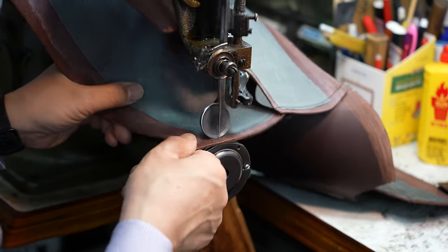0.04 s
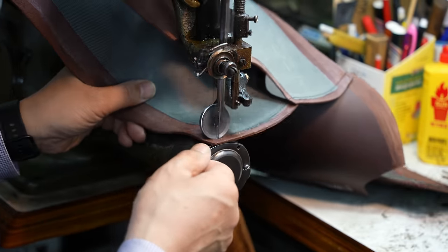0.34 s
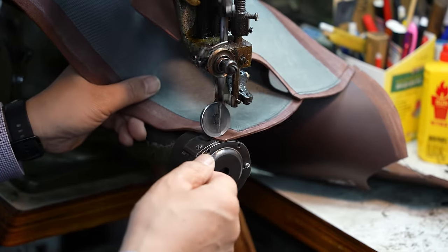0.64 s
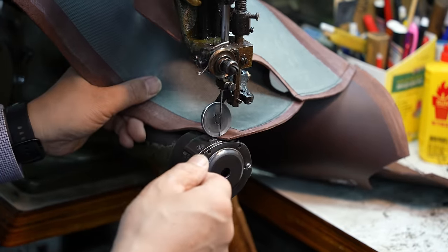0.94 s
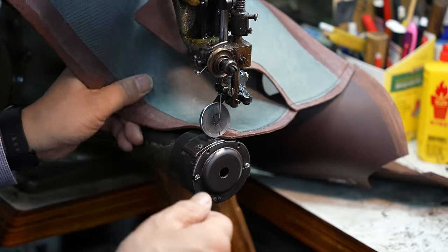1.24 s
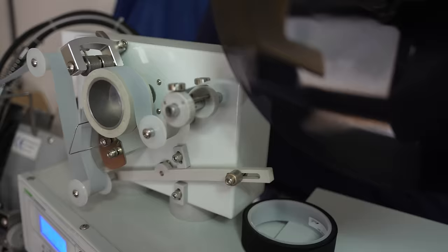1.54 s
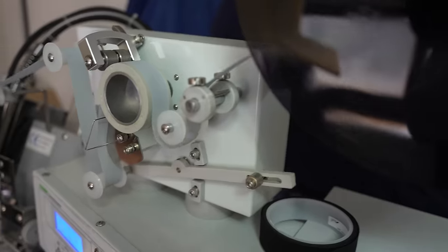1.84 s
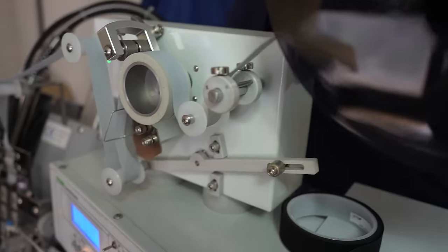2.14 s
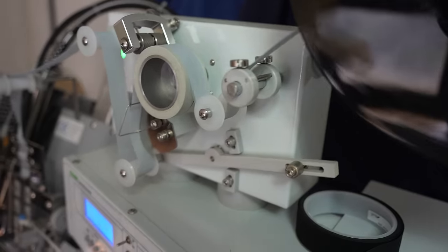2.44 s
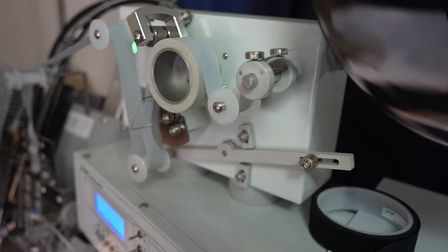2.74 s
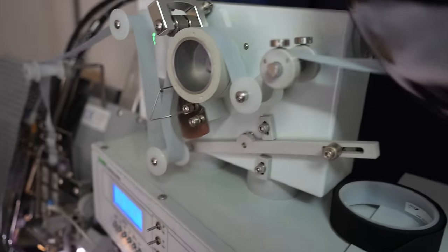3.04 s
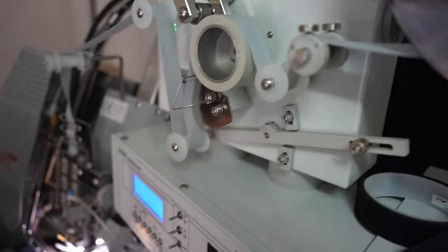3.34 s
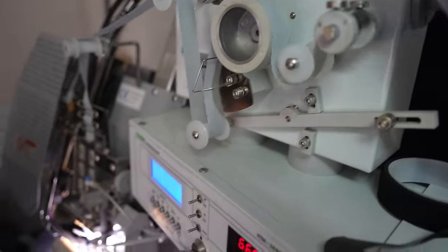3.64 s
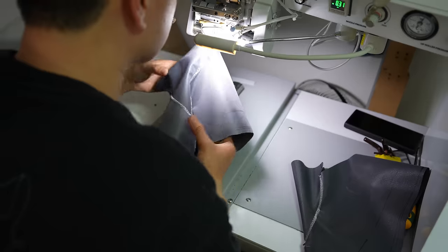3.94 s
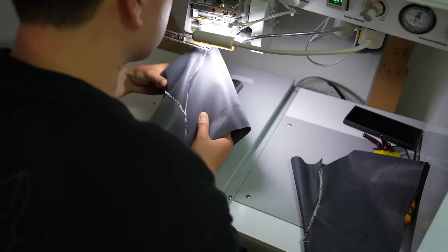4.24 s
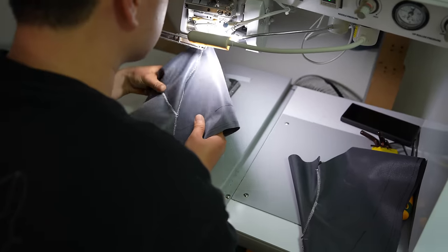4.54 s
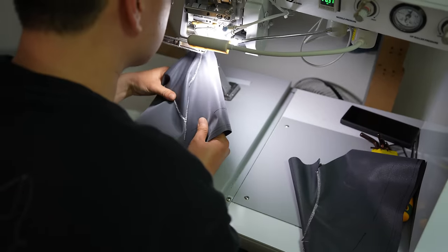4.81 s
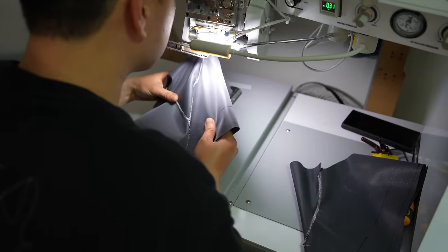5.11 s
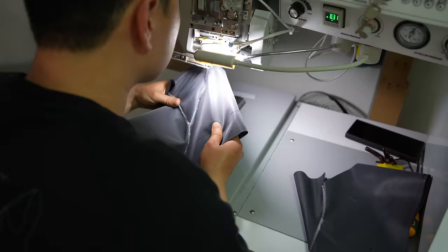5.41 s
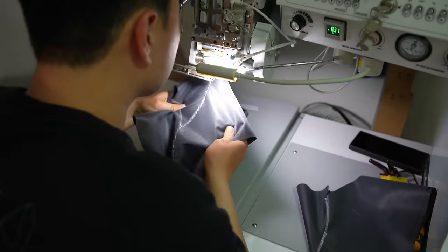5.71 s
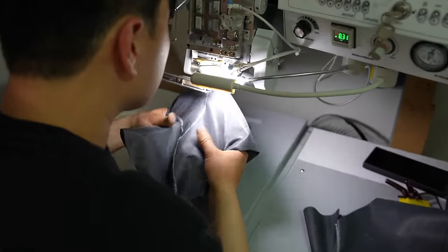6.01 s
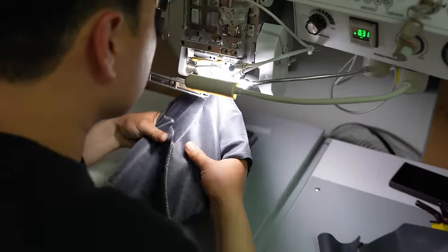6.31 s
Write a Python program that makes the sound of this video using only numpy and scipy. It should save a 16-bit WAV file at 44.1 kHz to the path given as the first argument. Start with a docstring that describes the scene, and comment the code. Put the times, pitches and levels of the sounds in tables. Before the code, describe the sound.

A brief, fast clatter from a heavy sewing machine gives way to slow, uneven clacks as its rods move one by one. Then air suddenly rushes from the nozzle of a seam taping machine and keeps hissing over a low hum. Heard first from beside the tape feed and then from the operator's seat in the workshop, the hiss shifts in tone, with one clunk and later a few mechanical knocks.

```python
"""A hot-air machine that tapes seams hisses in a workshop, after a heavy sewing machine has had its turn.
The sewing machine clatters through leather as its parts strike, brakes, and inches on with single clacks.
Then air rushes through the taping nozzle over a droning blower, heard first beside the tape feed and then
from the operator's seat, where it starts low, opens up with a clunk, and the mechanism knocks again."""
import sys
import numpy as np
from scipy import signal
from scipy.fft import irfft, next_fast_len
from scipy.io import wavfile
from scipy.ndimage import map_coordinates

SR = 44100
rng = np.random.default_rng(int(sys.argv[2]) if len(sys.argv) > 2 else 0)


def inscribe(sig):
    """Save sig as 16-bit PCM at rate SR to the path in sys.argv[1].

    A 1-D sig is mono; a 2-D sig holds one channel per row.
    Samples are clipped to [-1, 1] before scaling.
    """
    pcm = np.round(np.clip(np.atleast_2d(sig).T, -1, 1) * 32767)
    wavfile.write(sys.argv[1], SR, pcm.astype(np.int16))


N = 280917
TIME = np.arange(N) / SR
BRAKE_S, TAPING_S, SEAT_S, AIR_OPEN_S = .47, 1.578, 3.811, 3.988

# how hard the sewing machine's parts strike: (time [s], relative level [dB])
STRIKE_FORCE = [(0.0, -11.5), (0.454, -13), (0.538, -24.5), (0.56, -37)]
# how alike the ears are, at the sewing machine and the taping seat: (frequency [Hz], likeness [-1 to 1])
SEWING_LIKENESS = [(60, 0.99), (130, 1), (290, 0.96), (640, 0.73), (1410, 0.57), (3100, 0.31),
                   (6820, 0.064), (15000, 0.091)]
SEAT_LIKENESS = [(60, 1), (130, 1), (290, 0.95), (640, 0.95), (1410, 0.63), (3100, 0.67), (6820, 0.057),
                 (15000, 0.16)]
# which ear is louder in those places: (frequency [Hz], left minus right [dB])
SEWING_BALANCE = [(60, 0.0), (180, 0.44), (550, -0.64), (1650, -1.5), (4970, -0.81), (15000, -1.7)]
SEAT_BALANCE = [(60, 0.0), (130, 0.0), (290, 0.5), (640, 1.0), (1410, 0.25), (3100, 1), (6820, -1.9),
                (15000, -1.7)]
SEWING_STEREO, SEAT_STEREO = (SEWING_LIKENESS, SEWING_BALANCE), (SEAT_LIKENESS, SEAT_BALANCE)


def from_db(db):
    """Turn decibels into a gain to multiply by."""
    return 10 ** (np.asarray(db) / 20)


def rms_one(x):
    """Scale a stereo sound so that the average of its two sides has strength (rms) 1."""
    return x / np.sqrt(np.mean(x.mean(0) ** 2) + 1e-20)


def in_time(rows):
    """Read a (time, value) table at every sample."""
    return np.interp(TIME, *np.transpose(rows))


def at_hz(points, hz):
    """Read a (frequency, value) table, with octaves evenly spaced."""
    f, value = np.transpose(points)
    return np.interp(np.log(hz), np.log(f), value)


def after(s):
    """Switch from 0 to 1 within two milliseconds."""
    return np.clip((TIME - s) * 500, 0, 1)


def bump(centre_s, width_s):
    """A smooth rise to 1 and back."""
    return np.exp(-((TIME - centre_s) / width_s) ** 2)


def wander(rate_hz):
    """A smooth random curve, mostly between -1 and 1."""
    points = rng.standard_normal(int(N / SR * rate_hz) + 3)
    return map_coordinates(points, [TIME * rate_hz], order=3, mode="nearest")


def by_place(feed_db, seat_db):
    """One level beside the tape feed, another at the seat."""
    return feed_db + (seat_db - feed_db) * after(SEAT_S)


def filtered(x, hz, kind):
    """A gentle (second-order) filter."""
    return signal.sosfilt(signal.butter(2, hz, kind, fs=SR, output="sos"), x)


def freqs(size):
    """The frequencies that make up a sound of this many samples."""
    return np.maximum(np.arange(size // 2 + 1) * SR / size, 1)


def peak(centre_hz, width_hz, size):
    """Gain at each frequency for one resonance, a pitch at which something likes to ring."""
    return 1 / (1 + (2 * (freqs(size) - centre_hz) / width_hz) ** 2)


def resonant(colour, modes, modes_db, size):
    """Gain at each frequency: a broad tone colour with resonances (modes) standing out of it."""
    peaks = sum(from_db(db) * peak(hz, width, size) for hz, width, db in modes)
    return from_db(at_hz(colour, freqs(size))) * (1 + from_db(modes_db) * peaks)


def noise(gain, size, stereo):
    """Stereo noise with a gain at each frequency, alike in both ears in the bass, wide in the treble."""
    likeness, balance = stereo
    hz, sides = freqs(size), np.array([[1], [-1]])
    mid, side = np.exp(2j * np.pi * rng.random((2, len(hz))))
    alike = np.clip(at_hz(likeness, hz), -.99, .999)
    pair = mid + np.sqrt((1 - alike) / (1 + alike)) * side * sides
    return rms_one(irfft(gain * pair * from_db(sides * at_hz(balance, hz) / 2), size))


def steady(gain_of_size, stereo):
    """Noise that lasts the whole scene."""
    size = next_fast_len(N, real=True)
    return noise(gain_of_size(size), size, stereo)[:, :N]


def coloured_noise(colour):
    """Steady noise with a broad tone colour."""
    return steady(lambda size: from_db(at_hz(colour, freqs(size))), SEWING_STEREO)


def dying(size, ring_t60, room_db, room_t60, attack_s=0.00027):
    """A struck part rings briefly, the room a little longer; t60 is the seconds taken to fade 60 dB."""
    t = np.arange(size) / SR
    ring, room = from_db(-60 * t / ring_t60), from_db(room_db - 60 * t / room_t60)
    return np.hypot(ring, room) * (1 - np.exp(-t / attack_s))


def add(out, s, sound):
    """Mix a sound in, starting at s seconds."""
    i = max(round(s * SR), 0)
    out[:, i:i + sound.shape[1]] += sound[:, :N - i]


def quiet_shop(level_db=-38.5):
    """The faint, steady noise of the workshop."""
    # tone colour of the room: (frequency [Hz], relative level [dB])
    colour = [(15, -61), (25, -31), (49, -13), (86, -12), (121, -2), (150, -21), (213, -9), (271, -26),
              (373, -20), (415, -16.5), (588, -26), (833, -24.5), (2240, -29.5), (5570, -25), (15000, -41)]
    return from_db(level_db) * coloured_noise(colour)


def table_shake(run_db=-39, attack_s=.015, t60_s=0.38):
    """The sewing table rumbles while the drive pushes, in the run and in each nudge, then rings out."""
    # tone colour of the table: (frequency [Hz], relative level [dB])
    colour = [(21, -33), (35, -32), (70, -3), (109, -12), (134, -16), (200, -9.5), (250, -22), (320, -40),
              (550, -120)]
    # the drive nudges the machine on: (start [s], length [s], level [dB])
    nudges = [(.67, .04, -42), (.76, .155, -36), (1.072, 0.079, -39), (1.19, .07, -36)]
    power = 0
    for start, length, db in [(0.0076, BRAKE_S, run_db)] + nudges:
        attack = np.clip((TIME - start) / attack_s, 0, 1)
        fade_db = 60 * np.maximum(TIME - start - length, 0) / t60_s
        power += (attack * from_db(db - fade_db)) ** 2
    return np.sqrt(power) * coloured_noise(colour)


def sewing_speed(loss_per_s=6.0):
    """Share of full speed: steady, then falling to half under the brake."""
    return np.clip(1 - loss_per_s * (TIME - BRAKE_S), .5, 1)


def clatter(stitches_per_s=24.9, jitter_s=.0004, uneven_db=0.9, rattle_hz=900, level_db=-6.5, size=16384):
    """The same parts strike in every turn of the sewing machine; loose parts rattle anew each time."""
    # strikes of needle bar, hook, feed and foot: (point in the turn [0 to 1], relative level [dB])
    strikes = [(.01, 2), (.17, 2), (.32, 1), (.5, -.5), (.65, -2), (.85, -1.5)]
    # tone colour of the machine's body: (frequency [Hz], relative level [dB])
    colour = [(32, -43), (55, -18), (92, -4), (125, -17), (215, 10), (259, 3.5), (343, 2), (548, -15),
              (631, -3.5), (693, -4.5), (919, -4.5), (1610, -1.5), (3580, -7), (4750, -6.5), (15000, -16)]
    # its resonances: (frequency [Hz], width [Hz], relative level [dB])
    modes = [(367, 46, -5), (650, 18, -2), (940, 150, -7), (1610, 230, -4), (2360, 31, -17), (2660, 37, -4),
             (2970, 79, 0), (3950, 40, -15), (4640, 660, 0), (5850, 130, 0)]
    # loose parts rattle harder as the needle meets thicker leather: (time [s], relative level [dB])
    rattle_levels = [(0, -3), (.26, -1), (.325, 1.5), (.365, -2.5), (.41, -2), (.45, -1.5), (.5, -4)]
    out, hz = np.zeros((2, N)), freqs(size)
    force_db, rattle_db = in_time(STRIKE_FORCE), in_time(rattle_levels)
    turns = stitches_per_s * np.cumsum(sewing_speed()) / SR
    body = resonant(colour, modes, -3.0, size)
    envelope = dying(size, ring_t60=0.063, room_db=-4.0, room_t60=0.24)
    rattle_pitches = np.linspace(np.log(rattle_hz), np.log(SR / 2), 48)
    for share, db in strikes:
        ring = noise(body, size, SEWING_STEREO)
        for turn in range(13):
            i = np.searchsorted(turns, turn + share)
            # each rattle favours a few pitches of its own, and a harder one is brighter
            favoured_db = 4 * np.interp(np.log(hz), rattle_pitches, rng.standard_normal(48))
            tilt_db = 0.29 * (rattle_db[i] - rattle_db[0]) * np.log2(hz / rattle_hz)
            rattle = noise(body * from_db(favoured_db + tilt_db) * (hz > rattle_hz), size, SEWING_STEREO)
            gain = from_db(force_db[i] + db + level_db + rng.normal(0, uneven_db))
            strike = gain * envelope * (ring + from_db(rattle_db[i]) * rattle)
            add(out, i / SR + rng.normal(0, jitter_s), strike)
    return filtered(out, 450, "high")


def frame_hum(level_db=-1.0, waver_db=2.5):
    """The sewing machine's frame shakes in tones that sink with the speed and waver in strength."""
    # tones of the frame: (frequency at full speed [Hz], relative level [dB])
    tones = [(102.3, -37.5), (150.7, -43), (199.2, -40), (226.1, -36), (349.9, -33), (403.7, -44.5),
             (425.3, -39), (452.2, -46), (479.1, -55), (527.6, -51), (629.8, -40), (656.8, -37),
             (753.7, -41), (855.9, -36), (931.3, -35), (1007, -36), (1055, -40)]
    out, end = np.zeros((2, N)), round(STRIKE_FORCE[-1][0] * SR)
    travel = np.cumsum(sewing_speed()[:end]) / SR
    force_db = in_time(STRIKE_FORCE)[:end]
    for hz, db in tones:
        waver = np.interp(np.arange(end), np.linspace(0, end, 12), rng.standard_normal(12))
        tone = np.sqrt(2) * np.sin(2 * np.pi * (hz * travel + rng.random()))
        out[:, :end] += from_db(db + level_db + force_db - force_db[0] + waver_db * waver) * tone
    return out


def linkage_clacks(level_db=-4, size=16384):
    """Turned slowly, the sewing machine's linked rods strike one by one: a knock, a clack and a crack."""
    # single clacks: (time [s], relative level [dB], extra for the knock [dB], extra for the crack [dB])
    clacks = [(0.601, -24, -16, 1), (0.6723, -18, -17, -7), (0.737, -15.5, -31, -5.5),
              (0.7606, -20.5, -18, -1), (0.7843, -18, -23, 0.5), (0.7933, -14.5, -25, -3.5),
              (0.82, -22, -20, -14), (0.8457, -18, -15, -1), (0.8559, -21.5, -7, 6), (0.8706, -29, -8, 5),
              (0.9868, -25, -19, -2), (1.069, -18, -17, -10), (1.108, -26.5, -19, 0), (1.147, -26, -17, -6),
              (1.1804, -25.5, -6, -9), (1.1902, -20, -10, 3.5), (1.2063, -28, -10, 5),
              (1.2521, -27, -19, -2), (1.289, -27.5, -17, 2.5)]
    # tone colour of a clack: (frequency [Hz], relative level [dB])
    colour = [(88, -37), (150, -14), (409, -3), (505, -22), (612, -2.5), (1350, -5), (2060, -3.5),
              (2970, -9), (3270, -10.5), (7640, -23.5), (15000, -26)]
    # resonances of the rods: (frequency [Hz], width [Hz], relative level [dB])
    modes = [(339, 72, -4.5), (897, 31, -3), (1340, 250, -4), (1610, 62, -6), (3040, 200, -10),
             (3290, 69, -4), (3790, 39, -8), (4210, 74, -9), (5020, 53, -5), (5330, 31, -2), (5970, 35, 3),
             (6600, 50, 2)]
    out, body = np.zeros((2, N)), resonant(colour, modes, 4.7, size)
    for s, db, knock_db, crack_db in clacks:
        parts = [(knock_db + 9, -5, [250, 950]),   # low knock
                 (0, -10, [1000, 4200]),           # ringing clack
                 (crack_db, -4, [4600, 16000])]    # bright crack
        for part_db, room_db, band_hz in parts:
            ring = rms_one(filtered(noise(body, size, SEWING_STEREO), band_hz, "band"))
            envelope = dying(size, ring_t60=0.076, room_db=room_db, room_t60=0.32, attack_s=0.0029)
            add(out, s - .001, from_db(db + level_db + part_db) * ring * envelope)
    return out


def rumble(swell_db=9):
    """A faint, very low rumble that swells once."""
    low = steady(lambda size: peak(centre_hz=33, width_hz=35, size=size), SEAT_STEREO)
    level_db = by_place(feed_db=-52.5, seat_db=-56) + swell_db * bump(centre_s=3.27, width_s=.22)
    return from_db(level_db) * low


def blower(drone_db=2.0, hum_db=-4, hum_hz=118.7, waver_db=0.5):
    """The blower drones steadily, with a wavering hum from the mains power."""
    # tone colour of the drone: (frequency [Hz], relative level [dB])
    colour = [(35, -40), (66, -13), (85, -14), (101, -8.5), (124, 2), (178, -7), (269, -10), (380, -20),
              (407, -17.5), (450, -28), (580, -69), (990, -120)]
    hum = np.sqrt(2) * np.sin(2 * np.pi * hum_hz * TIME + .5 * wander(12))
    hum *= from_db(hum_db - waver_db * wander(6.9))
    drone = from_db(drone_db) * coloured_noise(colour)
    return from_db(by_place(feed_db=-37.5, seat_db=-41.5)) * (drone + hum)


def taping_knocks(size=16384):
    """Each moving part of the taping head lands with a knock at its own pitch."""
    # the parts landing: (time [s], level [dB], centre frequency [Hz], width [octaves])
    knocks = [(3.987, -17.5, 2200, 0.85), (3.989, -23, 170, 0.42), (4.008, -23, 3000, 1.8),
              (5.085, -18, 1400, 1.5), (5.110, -22.5, 900, 1.0), (5.129, -22, 205, 1),
              (5.168, -29.5, 556, 0.51), (5.197, -27, 269, 0.44), (5.735, -34.5, 430, 0.97)]
    out = np.zeros((2, N))
    envelope = dying(size, ring_t60=0.18, room_db=-9, room_t60=0.33)
    for s, db, hz, octaves in knocks:
        band = 1 / (1 + (np.log2(freqs(size) / hz) / octaves) ** 4)
        add(out, s, from_db(db) * noise(band, size, SEAT_STEREO) * envelope)
    return out


def jet_whistles(fade_s=0.18):
    """Resonances of the air jet swell and fade as breathy whistles while the listener moves."""
    # whistles: (start [s], end [s], frequency [Hz], width [Hz], level [dB])
    whistles = [(1.5, 3.1, 3330, 70, -36), (2.3, 3.1, 3720, 90, -33.5), (2.85, 3.9, 3606, 150, -30),
                (3.0, 4.55, 898, 130, -43), (2.8, 3.8, 6430, 130, -31), (4.1, 5.15, 4680, 400, -28),
                (4.2, 6.5, 3156, 150, -32.5), (5.55, 6.15, 4900, 120, -35)]
    out = np.zeros((2, N))
    for start, end, hz, width, db in whistles:
        size = next_fast_len(int((end - start) * SR), real=True)
        t = np.arange(size) / SR
        fade = np.clip(np.minimum(t, t[::-1]) / fade_s, 0, 1)
        add(out, start, from_db(db) * noise(peak(hz, width, size), size, SEAT_STEREO) * fade)
    return out


def jet(colour, modes, modes_db, stereo, echo_gain=0.21, sway_s=.00006, flutter_db=.25):
    """Air rushes through the nozzle; echoes off nearby panels colour it and shift as the listener sways."""
    air = steady(lambda size: resonant(colour, modes, modes_db, size), stereo)
    out, sway = air.copy(), sway_s * wander(1.187)
    delays_s, leans = rng.uniform(.002, .014, 14), rng.standard_normal(14)
    for k, (delay, lean) in enumerate(zip(delays_s, leans)):
        ear = k % 2
        out[ear] += echo_gain * np.interp(TIME - delay - lean * sway, TIME, air[ear])
    return rms_one(out) * from_db(flutter_db * wander(40))


def hot_air(feed_db=-15.5, seat_db=-14.5, low_flow_db=-3.0, treble_hz=6500, treble_kept=0.8):
    """The jet hisses beside the tape feed, then at the seat, softer and duller until the air opens up."""
    # tone colour of the hiss in each place: (frequency [Hz], relative level [dB])
    feed_colour = [(210, -42), (350, -25), (436, -17.5), (570, -9), (1330, -11), (1580, -2.5), (1820, -7.5),
                   (2830, -4), (3110, -7), (3590, -3), (3940, -4.5), (6520, -1.5), (9360, -8.5),
                   (12600, -2), (15000, -5)]
    seat_colour = [(210, -45), (350, -14), (677, -16), (768, -6), (1040, -15.5), (1140, -12), (1770, -4.5),
                   (2170, -6), (3110, -1), (4000, -3), (4540, -4.5), (6120, 0), (9360, -8), (12800, -2.5),
                   (15000, -4)]
    # resonances of the jet in each place: (frequency [Hz], width [Hz], relative level [dB])
    feed_modes = [(1610, 130, -4), (2000, 160, 4.5), (2890, 55, 9), (3310, 55, -1), (6460, 170, -6),
                  (8600, 74, 9)]
    seat_modes = [(890, 96, -3), (1140, 41, -3), (1790, 46, 3), (4600, 450, 4), (6120, 110, -10),
                  (8600, 160, 2), (11140, 200, 6), (13340, 250, 1)]
    # how alike the ears are beside the feed: (frequency [Hz], likeness [-1 to 1])
    feed_likeness = [(60, 1), (130, 1), (290, 0.97), (640, 1), (1410, 0.71), (3100, -0.0043), (6820, -0.11),
                     (15000, 0.14)]
    # which ear is louder there: (frequency [Hz], left minus right [dB])
    feed_balance = [(60, -4), (130, 3), (290, -11), (640, 3.5), (1410, 2), (3100, 3), (6820, -1),
                    (15000, 0.5)]
    feed = from_db(feed_db) * jet(feed_colour, feed_modes, -11.0, (feed_likeness, feed_balance))
    dip_db = -1.3 * bump(centre_s=5.18, width_s=0.072)   # the hiss dips as the mechanism knocks
    seat = from_db(seat_db + dip_db) * jet(seat_colour, seat_modes, -6.0, SEAT_STEREO)
    dull = signal.lfilter(*signal.butter(1, treble_hz, fs=SR), seat)
    low_flow = from_db(low_flow_db) * (dull + treble_kept * (seat - dull))
    return (feed * (after(TAPING_S) - after(SEAT_S))
            + low_flow * (after(SEAT_S) - after(AIR_OPEN_S))
            + seat * after(AIR_OPEN_S))


def scene():
    """First the sewing machine, then the taping machine."""
    sewing = clatter() + frame_hum() + linkage_clacks() + table_shake() + quiet_shop()
    under_hiss = blower() + rumble() + jet_whistles()
    taping_on = after(TAPING_S)
    return sewing * (1 - taping_on) + under_hiss * taping_on + hot_air() + taping_knocks()


def record(dry):
    """The highest treble is cut off steeply."""
    cutoff_hz = 14950
    return signal.sosfilt(signal.ellip(12, .1, 80, cutoff_hz, fs=SR, output="sos"), dry)


dry = scene()
out = record(dry)
inscribe(out)
```